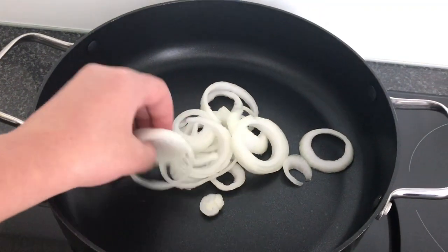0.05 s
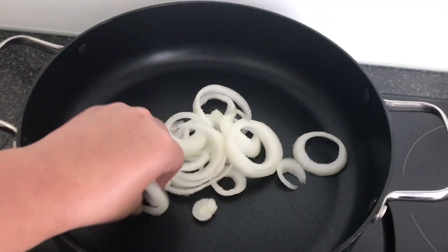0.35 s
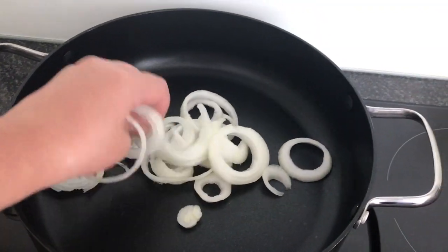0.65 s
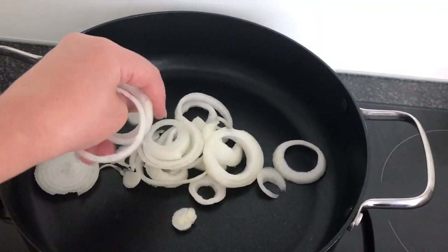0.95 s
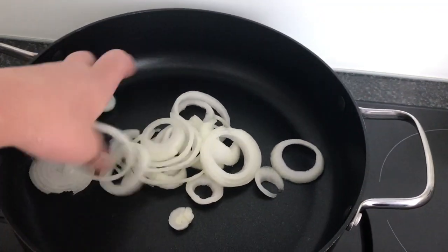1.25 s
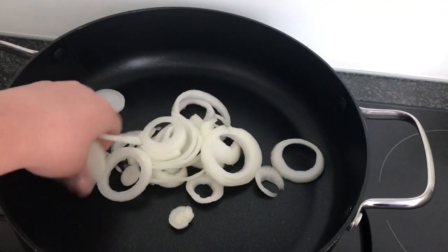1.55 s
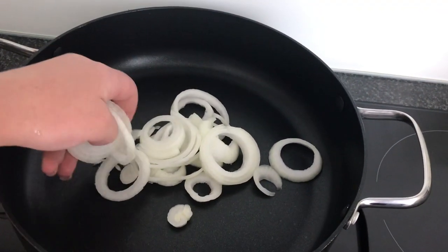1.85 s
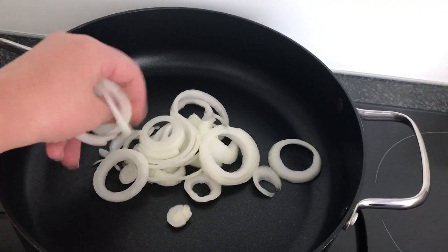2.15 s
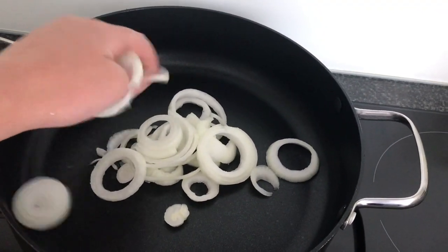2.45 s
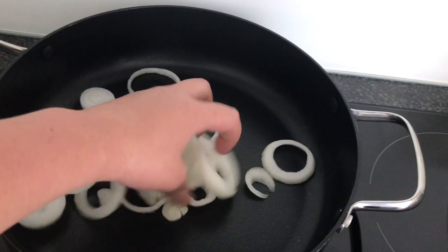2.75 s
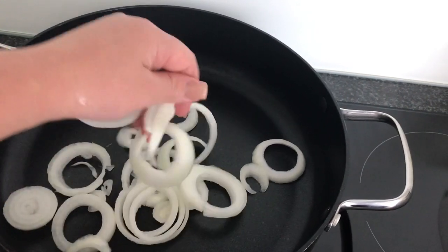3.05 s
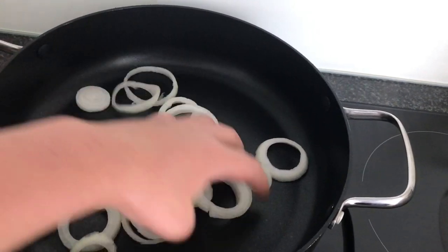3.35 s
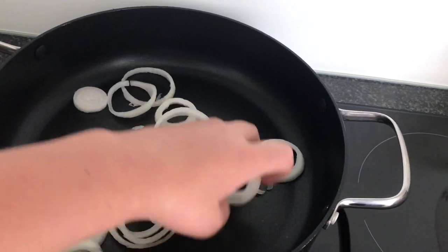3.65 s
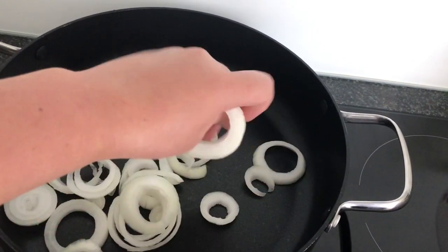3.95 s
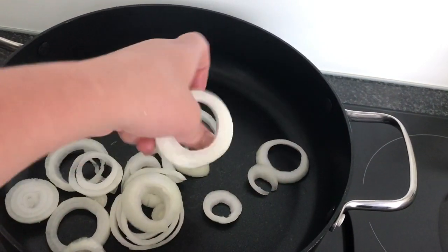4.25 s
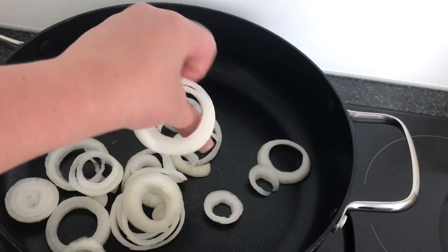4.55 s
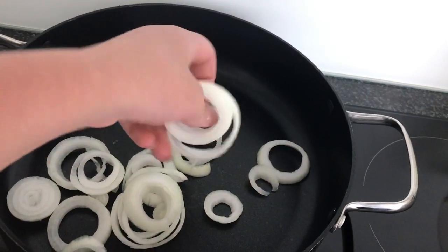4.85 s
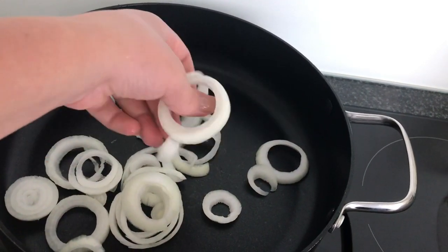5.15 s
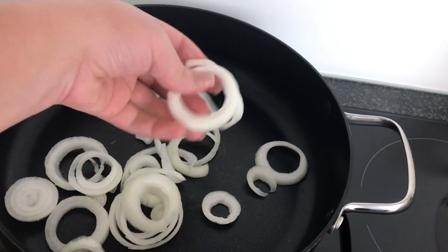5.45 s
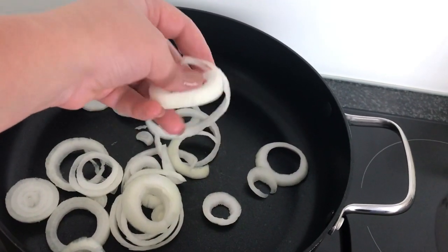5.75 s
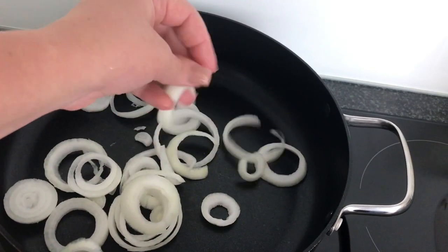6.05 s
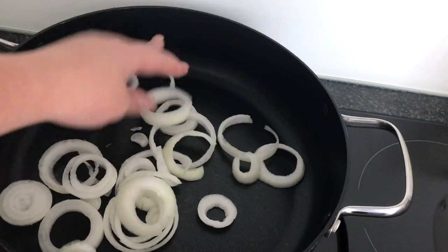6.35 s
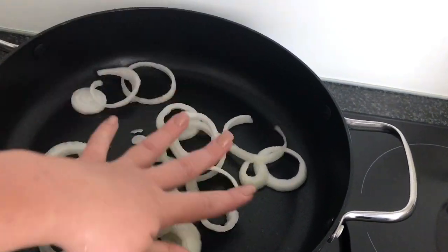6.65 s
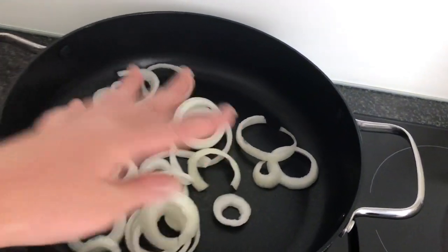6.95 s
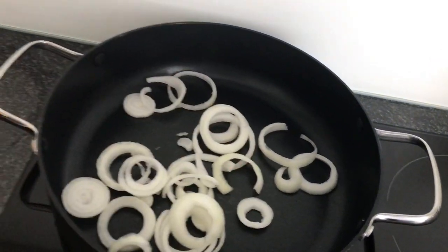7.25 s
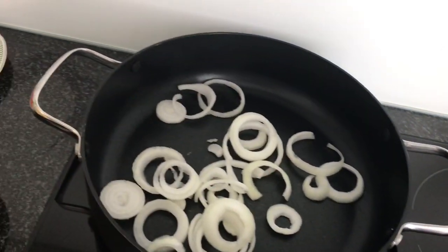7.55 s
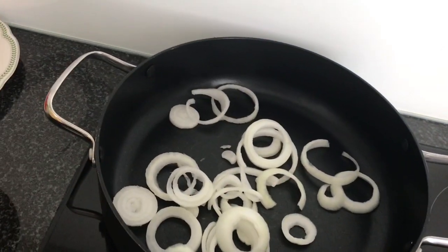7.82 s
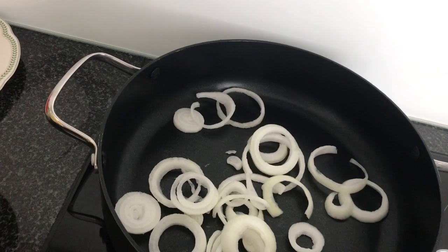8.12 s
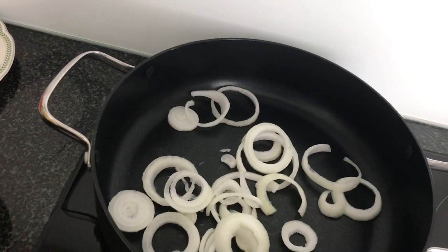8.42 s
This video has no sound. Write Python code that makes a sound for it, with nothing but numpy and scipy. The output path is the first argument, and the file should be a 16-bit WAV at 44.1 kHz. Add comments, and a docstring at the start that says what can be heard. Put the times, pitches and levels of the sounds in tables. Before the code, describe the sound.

Close to the microphone in a quiet kitchen, a hand pulls raw onion apart. The wet layers rub, squeak thinly and snap, and the rings land in an empty pot with soft taps and thuds. Metal clinks on the rim in two short clusters. Near the end come two dull knocks further off, then fingers scuff by the microphone. An appliance hums throughout.

```python
"""Onion rings into an empty pot

A quiet kitchen, a hand-held phone close to a wide pot. Raw onion is pulled apart by hand: wet layers
rub, squeak and snap, rings patter on the pot's floor, and metal on the reaching arm clinks on the rim.
Two dull knocks follow, further off, then fingers shift on the phone. An appliance hums throughout."""
import sys
import numpy as np
from scipy import signal
from scipy.fft import rfft, irfft
from scipy.io import wavfile
from scipy.ndimage import uniform_filter1d

SR = 44100
rng = np.random.default_rng(int(sys.argv[2]) if len(sys.argv) > 2 else 0)


def unload_audio(sound):
    """Save the sound as a 16-bit wav file, at the path given as the first command line argument."""
    columns = np.transpose(np.atleast_2d(sound))
    # keep every value between -1 and 1, then stretch to whole-number steps
    steps = np.round(np.clip(columns, -1, 1) * 32767)
    wavfile.write(sys.argv[1], SR, steps.astype(np.int16))


N = 374056
T = np.arange(N) / SR
AGE = np.arange(SR // 2) / SR  # seconds since a contact


def amp(db):
    """Decibels to gain."""
    return 10 ** (np.asarray(db) / 20)


def unit(x):
    """Scale to rms 1."""
    return x / np.sqrt(np.mean(x ** 2))


def unit_hit(x):
    """Scale a hit so that its loudest 3 ms have rms 1."""
    return x / np.sqrt(uniform_filter1d(x ** 2, size=132).max())


def colour(x, spectrum):
    """Shape a sound by a spectrum of (Hz, dB) points, at rms 1."""
    hz, db = np.transpose(spectrum)
    bins_hz = np.maximum(np.fft.rfftfreq(len(x), 1 / SR), 1)
    gain = amp(np.interp(np.log(bins_hz), np.log(hz), db))
    return unit(irfft(rfft(x) * gain, len(x)))


def cut(x, hz, kind, order=2):
    """Low-, high- or band-pass."""
    return signal.sosfilt(signal.butter(order, hz, kind, fs=SR, output="sos"), x)


def resonate(x, hz, q):
    """One resonance, gain 1 at its centre."""
    w = 2 * np.pi * hz / SR
    a = np.sin(w) / (2 * q)
    return signal.lfilter([a, 0, -a], [1 + a, -2 * np.cos(w), 1 - a], x)


def fade(t60):
    """Exponential decay after a contact, 60 dB in t60 seconds."""
    return np.exp(-np.log(1000) * AGE / t60)


def burst():
    """Noise for one contact."""
    return rng.standard_normal(len(AGE))


def ringing(modes):
    """Decaying modes; each contact point shares the energy out differently."""
    shares = amp(3 * rng.standard_normal(len(modes))) * rng.choice([-1, 1], len(modes))
    return unit_hit(sum(share * amp(db) * fade(t60) * np.sin(2 * np.pi * hz * AGE)
                        for share, (hz, db, t60) in zip(shares, modes)))


def add(out, start, x):
    """Mix x in at a start time in seconds."""
    i = max(int(start * SR), 0)
    out[i:i + len(x)] += x[:N - i]


def echo(x, t60, wet_db, delay_s):
    """The direct sound and a diffuse tail that starts after a delay."""
    tail = burst() * fade(t60) * (AGE > delay_s)
    return x + amp(wet_db) * signal.fftconvolve(x, tail / np.linalg.norm(tail))[:N]


def friction(spectrum, per_second, spread_db):
    """Tiny slips of very uneven size, stronger where the surfaces catch."""
    catch = unit(cut(rng.standard_normal(N), 74, "low"))
    slips = (rng.random(N) < per_second / SR) * rng.standard_normal(N)
    slips *= amp(spread_db * rng.standard_normal(N) + 2.5 * catch)
    return colour(echo(slips, t60=0.038, wet_db=-7, delay_s=0.00024), spectrum)


def stroke(peak, length, swell_share=0.42):
    """Gain of one sliding movement: a smooth swell to its peak and a slightly longer fade."""
    width = length * np.where(T < peak, swell_share, 1 - swell_share)
    return np.exp(-np.minimum(((T - peak) / width) ** 2, 50))


def strokes(rows):
    """Gain over time of several strokes; where they overlap, their powers add."""
    return np.sqrt(sum((amp(db) * stroke(peak, length)) ** 2 for peak, length, db in rows))


# The kitchen's room tone. Each row: frequency in Hz, relative level in dB.
AIR_SPECTRUM = [(25, -18), (48, 0.5), (80, -23), (118, -10), (150, -14.5), (230, -22.5), (400, -21),
                (520, -25), (1020, -27.5), (1600, -32.5), (2050, -34.5), (3000, -36), (5000, -41.5),
                (7500, -42.5), (10500, -44.5), (16000, -41.5)]
def room_tone(midrange_db=-67.07):
    """Steady air noise all around the microphone."""
    air = colour(rng.standard_normal(N), AIR_SPECTRUM)
    return amp(midrange_db) * air / np.std(cut(air, [200, 2000], "band"))


# A motor in the background. Each row: frequency in Hz, level in dB, wavering share from 0 to 1.
HUM_LINES = [(49.1, -58.5, 0.38), (66.6, -70, 0.78), (100.8, -62.5, 0.38), (182, -72, 0.93),
             (308, -84.5, 0.63), (337.6, -77.5, 0.93), (446, -75, 0.08), (965, -77.5, 0.36),
             (1044, -78.5, 0.34), (1355, -83, 0.57), (1444, -79, 0.28), (1497, -80.5, 0.7),
             (1580, -84.5, 0.8)]
def appliance_hum():
    """Each line of the motor is part steady tone, part wavering narrow noise."""
    hum = np.zeros(N)
    for hz, db, share in HUM_LINES:
        tone = np.sqrt(2) * np.sin(2 * np.pi * (hz * T + rng.random()))
        narrow_noise = resonate(rng.standard_normal(N), hz, q=hz / 16)
        waver = unit(resonate(narrow_noise, hz, q=hz / 16))
        hum += amp(db) * unit((1 - share) * tone + share * waver)
    return hum


# Handling rumble at the microphone. Each row: time in seconds, relative level in dB.
HANDLING_LEVELS = [(0, -58), (.8, -56), (1.45, -47.5), (1.9, -55.5), (4.7, -62), (5.8, -59.5),
                   (6.65, -51.5), (7.25, -57), (8.48, -50.5)]
# The hand nudging the pot on the hob. Each row: peak time in seconds, relative level in dB.
POT_NUDGES = [(.35, -40), (2.46, -43.5), (2.56, -41.5), (2.79, -40), (3.02, -43), (3.52, -46)]
# The low end that both share. Each row: frequency in Hz, relative level in dB.
RUMBLE_SPECTRUM = [(25, -25), (47, 13), (65, -1.5), (85, -2.5), (120, 0), (145, -16), (175, -11),
                   (260, -21.5), (500, -28.5), (1500, -36), (4000, -66)]
def rumble(rise_s=0.047, rocking_t60_s=1):
    """Each nudge sets the pot rocking and booming, over the rumble of the hand-held phone."""
    rocking = np.zeros(N)
    for peak, db in POT_NUDGES:
        rise = np.exp(-(np.minimum(T - peak, 0) / rise_s) ** 2)
        decay = np.exp(-np.log(1000) * np.maximum(T - peak, 0) / rocking_t60_s)
        rocking = np.hypot(rocking, amp(db) * rise * decay)
    handling = amp(np.interp(T, *np.transpose(HANDLING_LEVELS)))
    low = np.hypot(rocking, handling) * colour(rng.standard_normal(N), RUMBLE_SPECTRUM)
    boom = rocking * unit(resonate(rng.standard_normal(N), hz=175, q=9.4))
    return amp(-0.5) * low + amp(-13.5) * boom


# Fingers right by the microphone. Each row: peak time in seconds, length in seconds, level in dB.
GRIP_STROKES = [(8.085, 0.039, -64), (8.17, 0.097, -54), (8.23, .09, -59), (8.318, 0.089, -53.5),
                (8.41, 0.074, -63.5), (8.463, 0.038, -57.5)]
def grip():
    """Fingers shift and scuff on the phone's body."""
    spectrum = [(200, 7), (1500, 3.5), (2300, 3.5), (3700, 4.5), (7000, 0.5),
                (10500, -1.5), (14000, -1.5), (16000, -12)]
    return strokes(GRIP_STROKES) * friction(spectrum, per_second=7000, spread_db=2.7)


# Dull knocks beside the pot, further from the microphone.
# Each row: start in seconds, level in dB, brightness in Hz, ringing against the blow in dB.
KNOCK_HITS = [(7.587, -44, 3020, -21), (7.593, -37, 1185, -4.5), (7.869, -48, 3180, -2),
              (7.876, -52, 3170, -2), (7.887, -47.5, 1700, -24)]
# The knocked thing's modes. Each row: frequency in Hz, relative level in dB, t60 in seconds.
KNOCKED_MODES = [(1044, 3, .15), (1287, 0, .12), (1723, -6, .25), (2148, -13, .1), (2627, -3, .15),
                 (3176, 1, .075), (3402, -12, .15), (4420, -16, .1)]
def knocks():
    """Blunt blows on crockery or the worktop, far enough off that the room answers."""
    out = np.zeros(N)
    for start, db, hz, ring_db in KNOCK_HITS:
        contact = burst() * fade(0.06)
        thump = unit_hit(cut(cut(contact, 180, "high"), 1700, "low"))
        clack = unit_hit(resonate(contact, hz, q=12.5))
        blow = unit_hit(thump + amp(-1) * clack)
        add(out, start, amp(db) * unit_hit(blow + amp(ring_db) * ringing(KNOCKED_MODES)))
    return echo(out, t60=0.4, wet_db=-9, delay_s=0.011)


def moist_ticks(count=60, span_s=7.5):
    """Wet surfaces part with faint ticks, scattered over the time the hand is in the pot."""
    out = np.zeros(N)
    for when, size, pitch in rng.random((count, 3)):
        parting = burst() * fade(0.021) * (1 - fade(0.017))
        tick = unit_hit(resonate(parting, hz=8000 + 6000 * pitch, q=2))
        add(out, span_s * when, amp(-71.5 + 7.3 * size) * tick)
    return out


# Wet layers and skin rubbing, close up. Each row: peak time in seconds, length in seconds, level in dB.
RUB_STROKES = [(.105, 0.078, -55), (.385, 0.095, -55), (.48, 0.52, -67), (.71, 0.094, -60.5),
               (.98, 0.06, -60.5), (1.19, 0.029, -60), (2.01, 0.12, -56.5), (2.075, 0.059, -54.5),
               (2.275, 0.052, -63), (2.85, 0.24, -52.5), (3.17, 0.51, -61.5), (3.89, 0.25, -62.5),
               (4.3, .045, -66.5), (4.535, 0.028, -59), (4.64, 0.098, -56.5), (4.92, 0.076, -62.5),
               (5.15, 0.063, -65), (5.9, 0.34, -70), (6.37, 0.06, -64), (6.65, 0.16, -62),
               (6.885, 0.094, -59.5)]
# Their squeaks. Each row: peak time in seconds, length in seconds, level in dB, pitch in Hz.
SQUEAK_STROKES = [(.9, .07, -65, 9000), (1.006, 0.04, -62, 9600), (2.078, 0.02, -48, 5370),
                  (4.655, 0.088, -62.5, 6440), (4.648, 0.1, -70, 4230), (4.75, .014, -64, 9200)]
# The hiss of wet friction. Each row: frequency in Hz, relative level in dB.
RUB_SPECTRUM = [(300, 4), (1500, -7.5), (2500, -6.5), (4000, -3), (6500, -1.5), (8500, -1), (10500, -3),
                (13000, 1.5), (16000, -5)]
def onion_rubbing():
    """Each stroke swells and fades; where a wet layer sticks and slips, it squeaks thinly."""
    slips = friction(RUB_SPECTRUM, per_second=4000, spread_db=4)
    squeaks = sum(amp(db) * stroke(peak, length) * unit(resonate(slips, hz, q=11))
                  for peak, length, db, hz in SQUEAK_STROKES)
    return strokes(RUB_STROKES) * slips + squeaks


# Metal on the arm touching the rim, near the microphone.
# Each row: start in seconds, level in dB, then body and top in dB against that level.
RIM_HITS = [(1.1425, -44.5, -8, -6.5), (1.4, -36, -20, -6), (1.4044, -36, -19, -5), (1.501, -50, -15, -11),
            (1.506, -34.5, -29, -2), (1.6907, -29.5, -19.5, 0.5), (1.7288, -49, -6, -17),
            (2.765, -32, -18.5, -32), (3.4907, -32.5, -16.5, -8), (3.502, -34, -32, -2),
            (3.5151, -30, -51, -9), (3.5374, -41.5, -7, -20), (3.569, -46, -23, -21),
            (3.656, -35.5, -15.5, 0.5), (3.7213, -51.5, -13, -23), (7.755, -62, 1, -24)]
# The rim's short-lived clash. Each row: frequency in Hz, relative level in dB.
CLASH_SPECTRUM = [(2000, -32), (2600, -6.5), (3700, 12), (4800, 5.5), (6200, 10), (7400, 11), (8000, -2),
                  (8700, 13), (9600, 3), (10800, 0), (12400, 7), (14000, -1.5), (16000, -8)]
# The rim's lasting modes. Each row: frequency in Hz, relative level in dB, t60 in seconds.
POT_RIM_MODES = [(2750, -17, .2), (3262, -20, .2), (3709, -8, .11), (3905, -9, .13), (4053, -15, .09),
                 (4371, -11, .1), (4828, -14, .1), (5237, -10, .15), (5453, -11, .1), (5813, -11, .1),
                 (6112, 0, .095), (6503, -4, .11), (6865, -11, .17), (7057, -8, .13), (7310, -6, .13),
                 (7423, -13, .09), (8042, -15, .14), (8603, -9, .08), (8785, -4, .09), (9797, -13, .1),
                 (10072, -4, .09), (11240, -10, .09), (12263, -9, .07), (12871, -10, .07)]
def rim_clinks():
    """Hard contacts: a clash of short-lived modes over a few that ring on."""
    out = np.zeros(N)
    for start, db, body_db, top_db in RIM_HITS:
        clash = unit_hit(cut(colour(burst(), CLASH_SPECTRUM), 1800, "high") * fade(0.044))
        metal = clash + amp(-7) * ringing(POT_RIM_MODES)
        middle = unit_hit(cut(metal, 7740, "low", order=5))
        top = unit_hit(cut(metal, 8370, "high", order=4))  # a harder contact reaches further up
        body = unit_hit(cut(burst(), [350, 2600], "band") * fade(0.12))
        add(out, start, amp(db) * (middle + amp(top_db) * top + amp(body_db) * body))
    return out


# Close up: onion layers cracking apart, and at 1.364 s the click of a ring's edge as it lands.
# Each row: start in seconds, level in dB, brightness in Hz, length in seconds.
SNAPS_AND_CLICK = [(0.506, -54, 8100, 0.0031), (.706, -54, 6000, .004), (0.743, -41.5, 8800, 0.0056),
                   (.757, -33, 8500, 0.0026), (.855, -46, 7350, 0.0032), (.969, -52.5, 9100, 0.0072),
                   (1.186, -53.5, 10000, 0.0078), (1.322, -51, 9500, 0.0045), (1.364, -55.5, 3200, 0.003),
                   (2.054, -47.5, 6300, 0.019), (2.074, -50, 5600, .0053), (2.12, -52, 6800, 0.0072),
                   (2.215, -40, 5040, 0.0027), (2.369, -49.5, 9100, 0.0013),
                   (3.0474, -24.5, 13200, 0.000079), (3.048, -32.5, 2600, 0.0014),
                   (3.099, -47, 10200, 0.01), (3.257, -46, 9500, 0.0027), (3.916, -53, 11000, .0023),
                   (4.116, -54, 10800, 0.0019), (4.494, -50, 6730, 0.0017), (4.91, -51, 13000, 0.0093),
                   (5.284, -59, 8000, 0.0016), (5.769, -54.5, 13700, .002), (5.973, -53, 11300, .01),
                   (6.523, -56.5, 3740, 0.004)]
# What the pot's walls throw back at the microphone. Each row: frequency in Hz, relative level in dB.
WALL_SPECTRUM = [(1200, -5), (2500, 11), (3600, 10), (5000, 4), (7500, 2), (11000, 4.5), (16000, 4)]
def snaps_and_click():
    """Cell walls break, or a ring's edge lands, in quick clicks that rattle between the pot's walls."""
    out = np.zeros(N)
    for start, db, hz, length in SNAPS_AND_CLICK:
        uneven_clicks = burst() * amp(5.1 * burst())
        crackle = uneven_clicks * np.exp(-(AGE / length) ** 2)
        add(out, start, amp(db) * unit_hit(resonate(crackle, hz, q=0.77)))
    direct = cut(out, 1030, "high")
    wall_response = colour(burst(), WALL_SPECTRUM) * fade(0.052)
    return direct + amp(-26.5) * signal.fftconvolve(direct, wall_response)[:N]


# Close up: rings landing in the pot, and two soft thuds (0.335 and 0.382 s) as the hand nudges it.
# Each row: start in seconds, slap level in dB, slap pitch in Hz, level of the floor's thud in dB.
POT_HITS = [(0.098, -58, 396, -58), (.335, -72, 250, -56), (.382, -70, 300, -58), (1.148, -50, 1210, -45),
            (1.327, -54, 666, -51), (1.363, -50, 1090, -48.5), (1.429, -50, 1060, -47.5),
            (1.508, -50, 855, -49.5), (2.441, -40, 960, -36), (2.4443, -38, 347, -33),
            (2.52, -51.5, 325, -47), (2.56, -51, 400, -39.5), (2.67, -44, 1530, -45.5),
            (2.746, -50.5, 1380, -51), (2.767, -45, 685, -45), (2.798, -47.5, 443, -50),
            (2.881, -52.5, 545, -39.5), (2.957, -52.5, 990, -44), (3.027, -51, 1430, -55),
            (3.223, -46.5, 590, -48), (3.256, -39, 920, -40), (3.294, -51, 600, -45.5),
            (3.325, -47, 594, -49), (3.34, -38.5, 1390, -49), (3.393, -51.5, 388, -47),
            (3.516, -45.5, 1600, -43), (3.593, -49.5, 1000, -70), (3.797, -52, 1510, -52),
            (3.865, -51, 1240, -64), (3.949, -59.5, 1370, -58), (6.047, -54.5, 1300, -46.5),
            (6.1532, -48, 1270, -50.5), (6.346, -51.5, 1020, -49.5), (6.3741, -53.5, 1270, -46),
            (6.437, -55.5, 330, -45.5), (6.672, -58, 1240, -55)]
# A soft contact with the pot. Each row: frequency in Hz, relative level in dB.
SLAP_SPECTRUM = [(200, 4.5), (500, 3), (800, 2.5), (1100, -1), (1500, 2.5), (2100, -5.5), (3300, -6.5),
                 (5000, -13.5), (9000, -14), (16000, -12)]
# The modes of the pot's floor. Each row: frequency in Hz, relative level in dB, t60 in seconds.
POT_FLOOR_MODES = [(68, -3.5, 0.38), (110.2, 1.5, 0.35), (177.8, -1.5, 0.28), (211.5, -9, 0.42),
                   (330.3, -1.5, 0.14), (398, -8.5, 0.073), (411, -9.5, 0.085), (603, -21, 0.3)]
def pot_taps():
    """A falling ring or a nudge makes a slap with its own damped pitch and sets the floor thudding."""
    out = np.zeros(N)
    for start, slap_db, hz, thud_db in POT_HITS:
        contact = colour(burst(), SLAP_SPECTRUM) * (fade(0.046) + amp(-8) * fade(0.2))
        pitched = unit_hit(resonate(contact, hz, q=2.8))
        dull = unit_hit(cut(contact, 3.3 * hz, "low"))
        edge_tick = unit_hit(resonate(contact, hz=2700, q=1))
        slap = unit_hit(pitched + amp(-3.5) * dull + amp(-8) * edge_tick)
        floor = ringing(POT_FLOOR_MODES)
        thump = unit_hit(cut(burst(), [90, 420], "band") * fade(0.058))
        thud = unit_hit(floor + amp(-8.5) * thump)
        add(out, start, amp(slap_db) * slap + amp(thud_db) * thud)
    return out


def scene():
    """One microphone close to the pot, in a small hard-walled kitchen."""
    near = pot_taps() + rim_clinks() + snaps_and_click() + onion_rubbing() + moist_ticks() + grip()
    near_in_room = echo(near, t60=0.44, wet_db=-16.5, delay_s=0.0023)
    return (near_in_room + knocks() + rumble() + appliance_hum() + room_tone())[None]


def record(dry, bass_hz=34.3, top_hz=15900):
    """The phone's microphone drops the deepest bass and cuts the top steeply."""
    top_cut = signal.ellip(10, 0.2, 70, top_hz, fs=SR, output="sos")
    return signal.sosfilt(top_cut, cut(dry, bass_hz, "high", order=4))


dry = scene()
out = record(dry)
unload_audio(out)
```